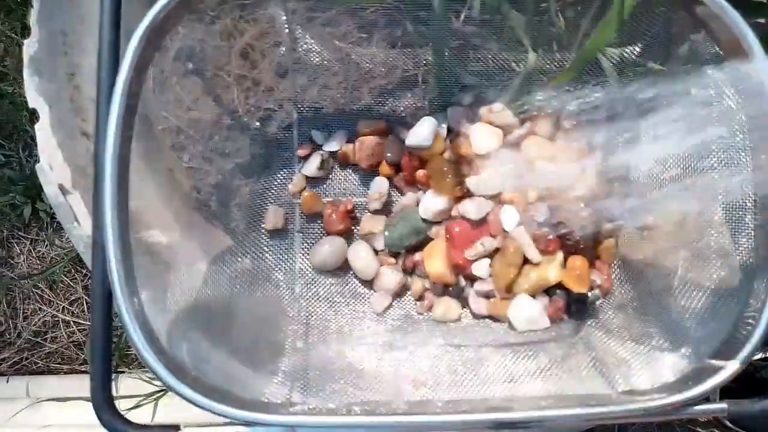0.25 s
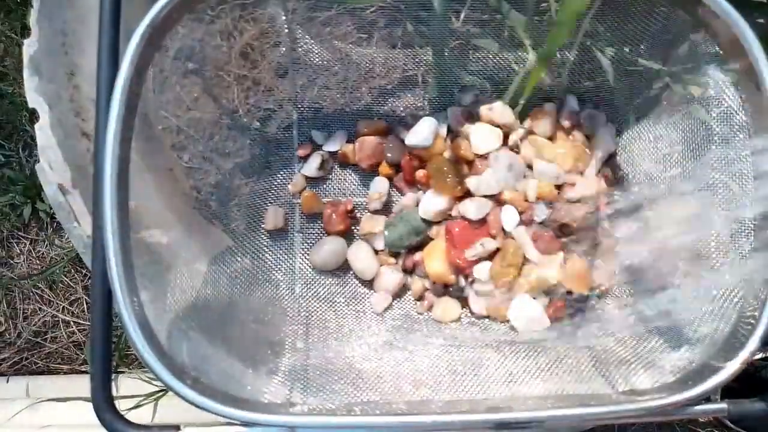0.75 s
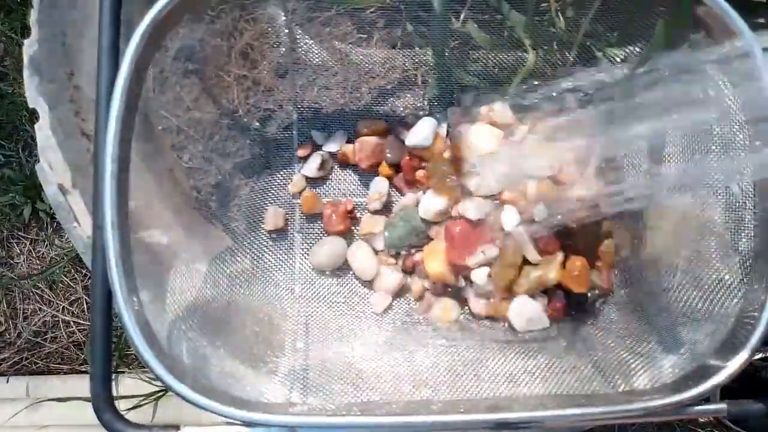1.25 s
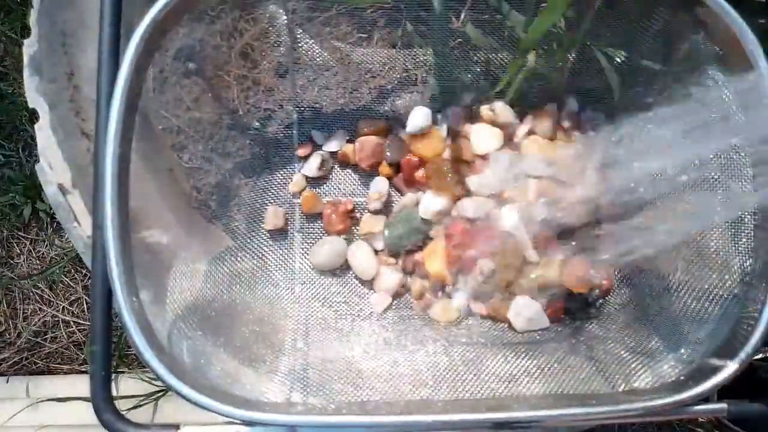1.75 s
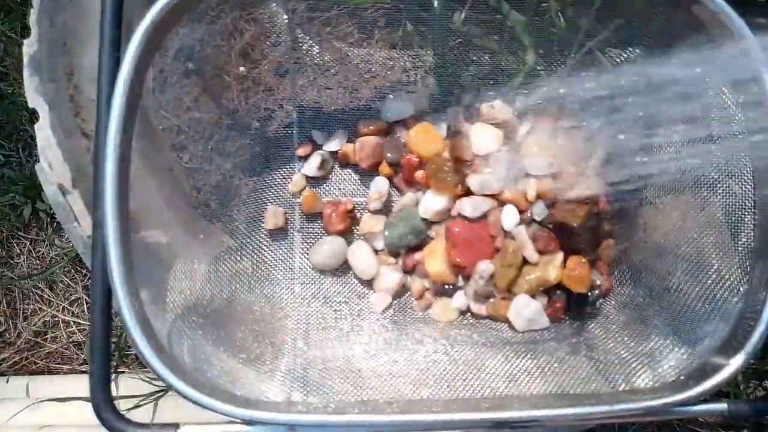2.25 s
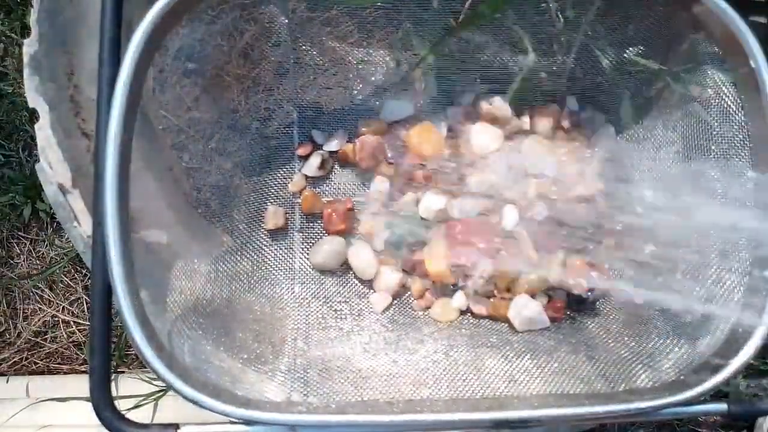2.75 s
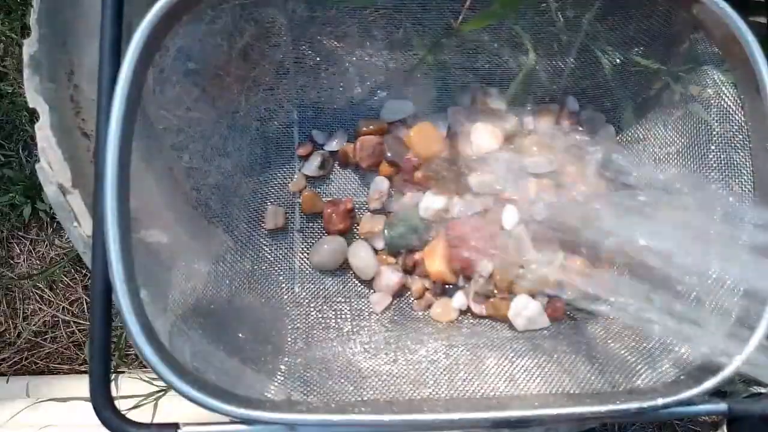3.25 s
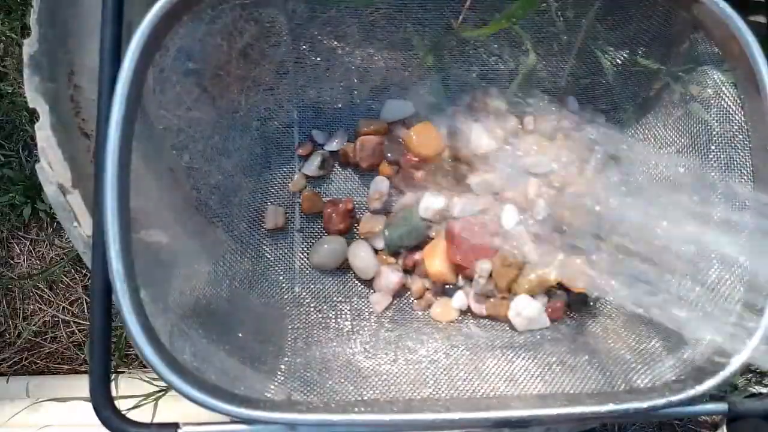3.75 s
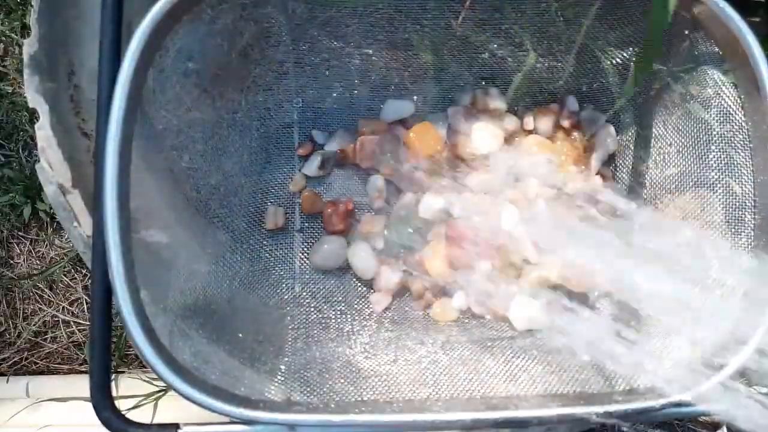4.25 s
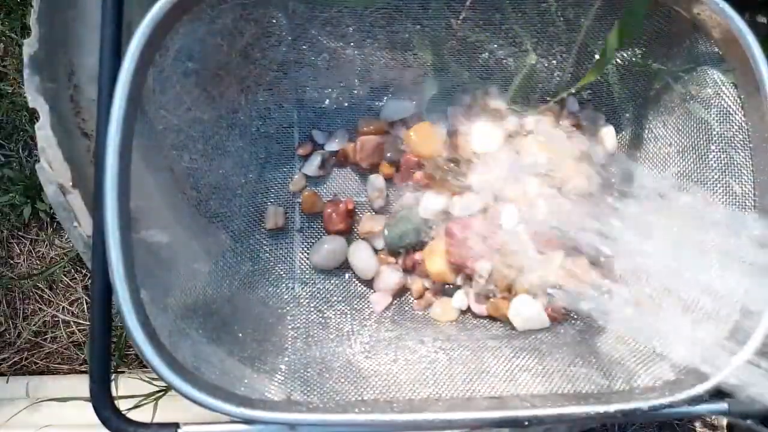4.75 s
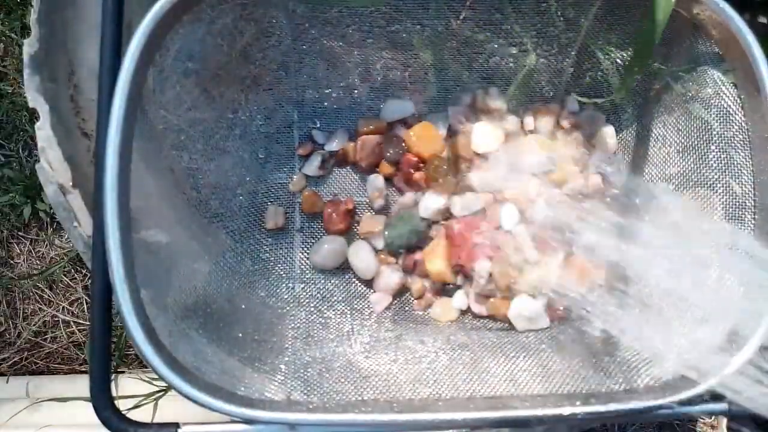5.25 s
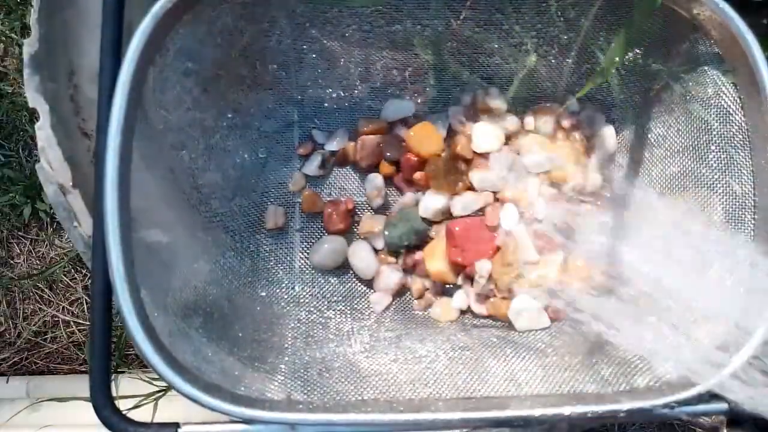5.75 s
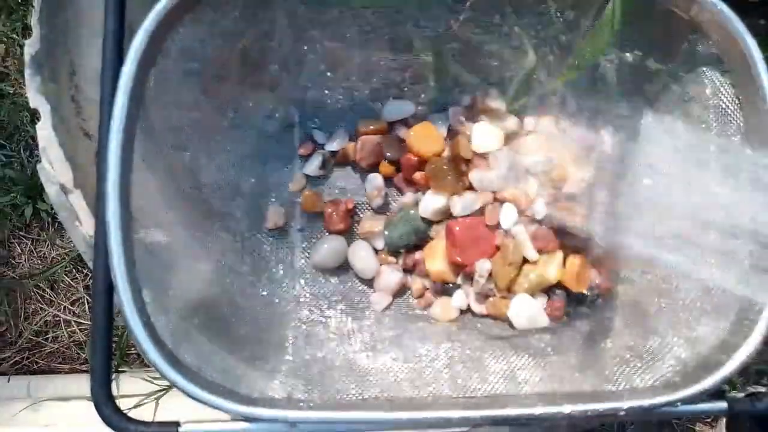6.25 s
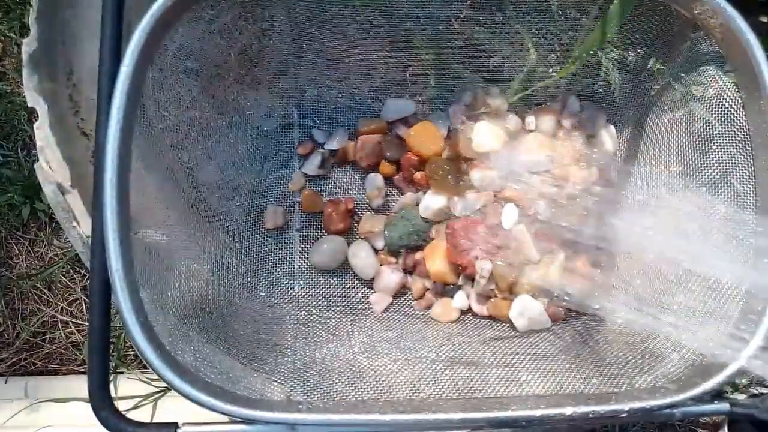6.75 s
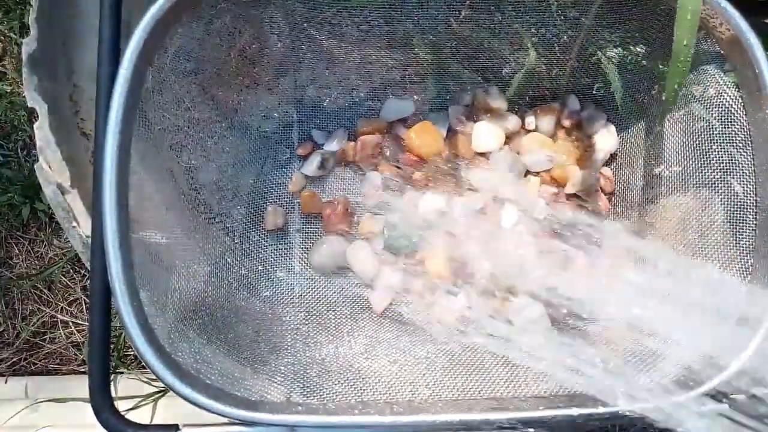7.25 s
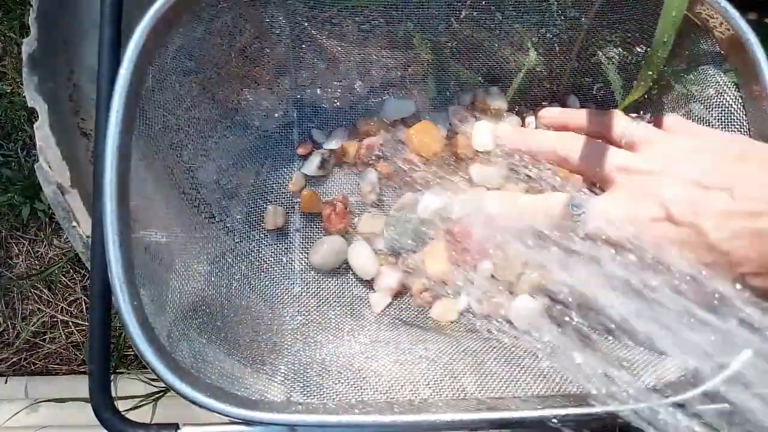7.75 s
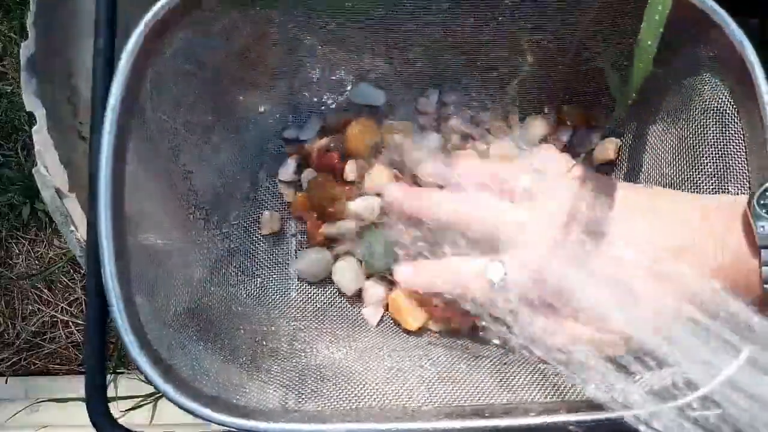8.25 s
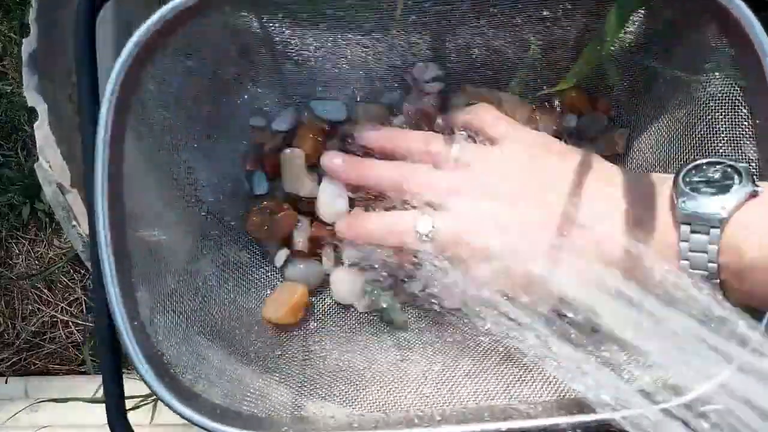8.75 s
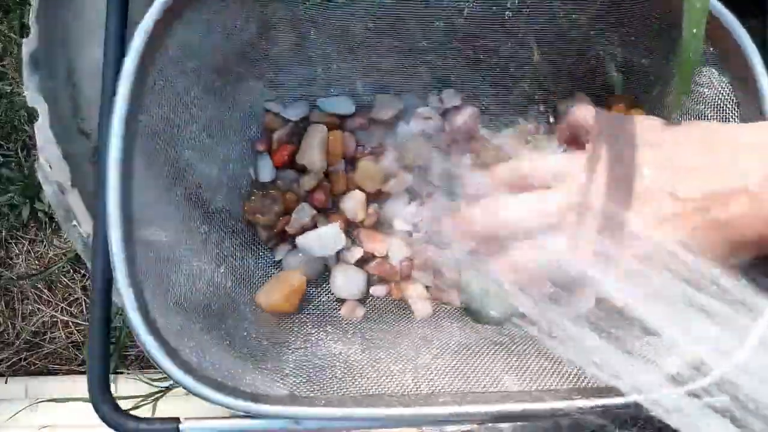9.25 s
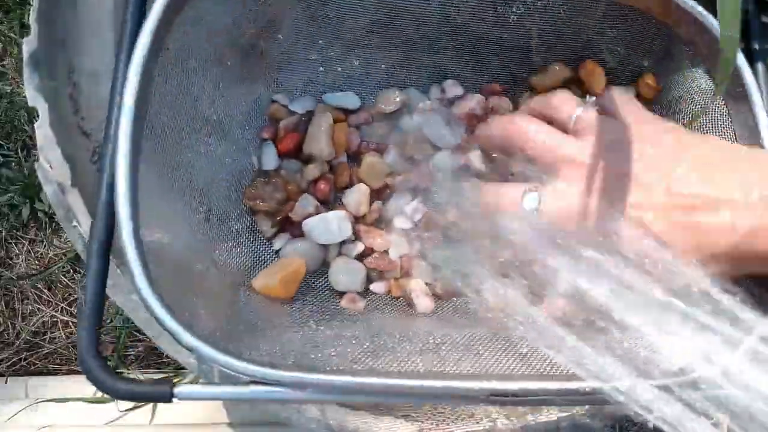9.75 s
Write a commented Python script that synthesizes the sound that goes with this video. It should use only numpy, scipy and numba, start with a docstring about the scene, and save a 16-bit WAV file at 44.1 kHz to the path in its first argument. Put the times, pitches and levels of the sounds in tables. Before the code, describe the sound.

A garden hose sprays pebbles in a wire sieve, heard close up in still outdoor air. For the first half second the sound is a thin, wet sizzle with a few sharp ticks. By about 0.8 seconds it has swelled into a bright, dense hiss of drops on the mesh and a crisp patter on the stones. It dips briefly around 1.4 seconds, then holds, wavering slightly as the jet moves. The wet sieve rings more brightly from about 2.5 seconds, and water trickles softly onto the ground underneath. At about 7.4 seconds a hand starts stirring the pebbles. The jet slaps on the hand in fuller, lower, irregular splashes, the stones clack together, with the sharpest clicks between 8 and 8.7 seconds, and water burbles faintly under the fingers. Spraying and stirring continue until the end at about 10 seconds.

```python
"""A bright, wet sizzle, thin and ticking at first, swells as a garden hose sprays pebbles in a wire sieve.
Thousands of drops a second hiss on the mesh and patter on the stones; the wet sieve rings and water
trickles off. From 7.4 s a hand stirs the pebbles: they clack, water burbles under the fingers, and the
jet slaps on the hand in fuller, lower splashes. It is all heard close up, over still garden air."""
import sys
import numpy as np
from scipy import signal
from scipy.fft import rfft, irfft
from scipy.io import wavfile
from scipy.ndimage import uniform_filter1d, minimum_filter1d
from numba import njit

SR = 44100
rng = np.random.default_rng(int(sys.argv[2]) if len(sys.argv) > 2 else 0)


def log_audio(samples):
    """Write samples as a 16-bit WAV file to the path given in sys.argv[1]."""
    # one column per channel
    frames = np.atleast_2d(samples).T
    # limit to full scale, then quantise
    limited = np.clip(frames, -1, 1)
    pcm = np.round(limited * 32767).astype(np.int16)
    wavfile.write(sys.argv[1], SR, pcm)


N = 440559
TIME_S = np.arange(N) / SR
HAND_IN_S, REACH_S, PRESS_S = 7.405, 0.023, 0.37  # the hand's cue; time to reach in and to press down


def undb(db):
    """Decibels to gain."""
    return 10 ** (np.asarray(db) / 20)


def together(a_db, b_db):
    """The level of two unrelated sounds at once."""
    return 10 * np.log10(undb(a_db) ** 2 + undb(b_db) ** 2)


def unit(x):
    """Scale to rms 1."""
    return x / np.sqrt(np.mean(x ** 2))


def curves(table):
    """The columns of a timed table as automation curves, one value a sample."""
    times, *columns = np.transpose(table)
    return [np.interp(TIME_S, times, column) for column in columns]


def hand_fade(length_s):
    """Fades from 0 to 1 at the hand's cue and stays there."""
    return np.clip((TIME_S - HAND_IN_S) / length_s, 0, 1)


def wander(per_s):
    """A random drift of rms 1 that turns per_s times a second."""
    return unit(np.interp(TIME_S * per_s, np.arange(N // 4), rng.standard_normal(N // 4)))


def colour(x, tone, size=2048):
    """Minimum-phase EQ through the points of a tone table; the result has rms 1."""
    hz, db = np.transpose(tone)
    grid_hz = np.maximum(np.arange(size // 2 + 1) * SR / size, 1)
    gains = undb(np.interp(np.log(grid_hz), np.log(hz), db))
    cepstrum = irfft(np.log(gains))
    cepstrum[1:size // 2] *= 2
    cepstrum[size // 2 + 1:] = 0
    impulse = irfft(np.exp(rfft(cepstrum)))
    return unit(signal.fftconvolve(x, impulse)[:N])


@njit
def bandpass(x, hz, width_hz):
    """State-variable band-pass whose centre may move."""
    out, band, low = np.empty(len(x)), 0., 0.
    for i in range(len(x)):
        tuning, damping = np.tan(np.pi * hz[i] / SR), width_hz / hz[i]
        swing = (band + tuning * (x[i] - low)) / (1 + tuning * (tuning + damping))
        band, low = 2 * swing - band, low + 2 * tuning * swing
        out[i] = damping * swing
    return out


def ring(x, hz, width_hz):
    """A steep-sided resonance; the result has rms 1."""
    centre_hz = hz * np.ones(N)
    once = bandpass(x, centre_hz, float(width_hz))
    return unit(bandpass(once, centre_hz, float(width_hz)))


def drops(per_s, scatter_db):
    """Random impacts of unequal size; the power stays even however many fall."""
    chance = 1 - np.exp(-per_s / SR)
    hits = rng.random(N) < chance
    sizes = undb(scatter_db * rng.standard_normal(N)) * rng.standard_normal(N)
    return unit(hits * sizes / np.sqrt(chance))


# The dull bed of the quiet garden: frequency_hz, level_db
AIR_TONE = [(20, 10), (45, -3), (75, 0), (125, 3.5), (200, -7.5), (500, 7), (4000, -28)]


def garden_air():
    """Still air lays a faint, dark noise under everything."""
    return undb(-77.5) * colour(rng.standard_normal(N), AIR_TONE)


# Cues for the soft low bumps: centre_s, level_db
BUMP_CUES = [(0.819, -65), (1.108, -67), (1.307, -61), (2.225, -59), (2.727, -68), (2.868, -64.5),
             (3.906, -64), (4.028, -61), (4.481, -62), (6.619, -60.5), (6.717, -64), (6.841, -64),
             (7.226, -58.5), (7.407, -62), (8.073, -46.5), (8.293, -55), (8.486, -62), (8.771, -59),
             (9.243, -63), (9.467, -54)]


def bumps(width_s, gain_db):
    """Single soft pressure pulses, a few milliseconds long."""
    out, count = np.zeros(N), 800
    pulse = np.exp(-((np.arange(count) - count // 2) / SR / width_s) ** 2)
    for centre_s, level_db in BUMP_CUES:
        start = int(centre_s * SR) - count // 2
        out[start:start + count] += undb(level_db + gain_db) * pulse
    return out


# The round, low-mid tone of water landing on the ground: frequency_hz, level_db
RUNOFF_TONE = [(100, -25), (175, -17), (230, -9), (310, -2.5), (450, -2.5), (580, 1.5), (780, 3), (1000, 0),
               (1600, -8.5)]


def runoff(jet_db):
    """Bigger drops fall through the mesh and trickle on the ground, following a third of the jet's swing."""
    level_db = -51.05 + 0.33 * (jet_db - np.median(jet_db)) + 1.8 * wander(14)
    return undb(level_db) * colour(drops(6000, scatter_db=1.0), RUNOFF_TONE)


def pebble_clacks(splash_db, low_hz, high_hz, decay_s, gain_db, scatter_db, count):
    """Stirred pebbles knock together, each at its own pitch, hardest within a splash."""
    t, out = np.arange(SR // 40) / SR, np.zeros(N + SR)
    for when, pitch, softness in rng.random((count, 3)):
        start = int(HAND_IN_S * SR + when * (N - 1 - HAND_IN_S * SR))
        pitch_hz = low_hz * (high_hz / low_hz) ** pitch
        knock = np.sin(2 * np.pi * pitch_hz * t) * np.exp(-t / decay_s)
        out[start:start + len(t)] += undb(splash_db[start] + gain_db - scatter_db * softness) * knock
    return out[:N]


# Sharp accents from heavy drops and knocked pebbles: start_s, level_db
TICK_CUES = [(0.2668, -14), (0.307, -23), (0.3586, -14), (0.4015, -13), (0.4817, -12), (1.0714, -9),
             (2.0597, -18), (3.052, -10), (3.1562, -16), (7.3914, -17), (7.5836, -9), (7.8022, -7),
             (8.074, -6), (8.184, -1), (8.3864, 2), (8.486, -8.5), (8.5254, -7), (8.6213, -10), (8.676, 1),
             (8.7715, -17), (9.1324, -10), (9.2988, -7), (9.839, -10)]


def ticks(decay_s, gain_db):
    """A heavy drop or a knocked pebble gives a bright crack, too brief to carry bass."""
    out, count = np.zeros(N), 256
    fade = np.exp(-np.arange(count) / SR / decay_s)
    bursts = fade * rng.standard_normal((len(TICK_CUES), count))
    cracks = signal.sosfilt(signal.butter(2, [10200, 14800], "bandpass", fs=SR, output="sos"), bursts)
    for (start_s, level_db), crack in zip(TICK_CUES, cracks):
        start = int(start_s * SR)
        out[start:start + count] += undb(level_db + gain_db) * crack / np.max(np.abs(crack))
    return out


# Slugs of water hitting stones and hand, with a send to each layer they excite:
# start_s, length_s, slap_db, mesh_db, hollow_ring_db, cupped_ring_db
SPLASH_CUES = [(0.283, 0.019, -46.5, -45, -66, -58), (7.417, 0.099, -35, -22, -57, -39),
               (7.655, 0.1, -36, -22, -38.5, -31), (7.801, .15, -38, -21.5, -42, -35),
               (8.077, 0.097, -36.5, -22, -36, -44), (8.214, 0.11, -36, -21, -39, -52),
               (8.372, 0.017, -42, -19, -33.5, -46), (8.533, 0.034, -47, -32, -42, -41),
               (8.611, 0.018, -43, -17.5, -54, -52), (8.663, 0.051, -38, -24, -42, -41),
               (8.8, 0.052, -34.5, -24.5, -44, -35), (8.931, .08, -34, -21, -43, -30.5),
               (9.015, 0.076, -38.5, -21.5, -59, -40), (9.107, 0.098, -39.5, -21.5, -47, -30),
               (9.242, 0.14, -43.5, -23.5, -52.5, -39), (9.406, 0.083, -37.5, -23, -40, -31),
               (9.579, 0.094, -36, -24.5, -40.5, -38), (9.815, .1, -41, -21, -47, -54.5)]


def splash_envelopes(attack_s, release_s):
    """Each splash swells, holds and dies away; one envelope in dB for each layer it excites."""
    t, gains = np.arange(SR // 2) / SR, np.zeros((4, N + SR))
    for start_s, length_s, *sends_db in SPLASH_CUES:
        shape = np.minimum(t / attack_s, 1) * np.exp(-np.maximum(t - length_s, 0) / release_s)
        start = int(start_s * SR)
        gains[:, start:start + len(t)] += np.outer(undb(sends_db), shape)
    return 20 * np.log10(gains[:, :N] + 1e-9)


# The full midrange of a slap of water: frequency_hz, level_db
SPLASH_TONE = [(150, -68), (350, -16.5), (520, -28.5), (750, -7), (1050, -5.5), (1500, -3), (1830, -2),
               (2100, -1.5), (2400, 0), (3200, 3.5), (4600, 0), (6000, 1), (9000, -23), (14000, -22)]


def splashes(splash_db, cupped_db):
    """Water slaps on stones and skin; it rings under the fingers and burbles louder as it gathers."""
    burble_db = -70.5 + 4 * (TIME_S - HAND_IN_S) + 2.2 * wander(30)
    slap = undb(splash_db + 3.5) * colour(drops(11000, scatter_db=0.8), SPLASH_TONE)
    burble = ring(drops(900, scatter_db=2.0), hz=360 * (1 + 0.041 * wander(15)), width_hz=150)
    cupped = undb(cupped_db - 5.0) * ring(drops(4400, scatter_db=9.0), hz=2170, width_hz=590)
    return slap + cupped + hand_fade(REACH_S) * undb(burble_db) * burble


# Notches either side of the sieve's bright ring, depths from 0 to 1:
# time_s, lower_depth, upper_depth, upper_hz
NOTCH_MOVES = [(0.0, 0.1, 0.6, 4230), (0.4, .02, 0.6, 4250), (0.6, 0.4, 0.7, 4360), (1.9, 0, 0.44, 4160),
               (2.5, 0.1, 0, 4750), (3.3, 0.1, 0.26, 4600), (5.3, 0.24, 0.24, 4900), (7.3, 0.5, 0.14, 5000),
               (7.5, .05, 0.3, 4850)]


def sieve_notches(x, lower_hz, width_hz):
    """Beside a resonance the sieve moves against the direct sound and partly cancels it."""
    lower_depth, upper_depth, upper_hz = curves(NOTCH_MOVES)
    x = x - lower_depth * bandpass(x, lower_hz * np.ones(N), float(width_hz))
    return x - upper_depth * bandpass(x, upper_hz, float(width_hz))


def sieve_rings(mesh_db, knock_db, bright_db, middle_db, thin_db, hollow_db):
    """Drops keep four damped resonances ringing, each as strong as the landing spot allows."""
    drum_db = together(mesh_db + hollow_db + 1.3 * wander(16), knock_db)
    # the hollow ring sinks under a square hit and rises, unsteady, under the pressing hand
    free_hz = 1202 - 3.9 * (bright_db - np.median(bright_db))
    pressed_hz = 1471 * (1 + 0.058 * wander(45))
    drum_hz = free_hz + hand_fade(PRESS_S) * (pressed_hz - free_hz)
    splutter_db, drift = 0.97 * wander(24), 0.011
    bright_hz = 3577 * (1 + drift * wander(9))
    # level_db, pitch_hz, width_hz
    modes = [(drum_db + 0.5, drum_hz * (1 + drift * wander(4.2)), 260),
             (mesh_db + bright_db + splutter_db - 0.7, bright_hz, 500),
             (mesh_db + middle_db - 2.0, 5500, 850),
             (mesh_db + thin_db - 1.5, 6680, 750)]
    rings = sum(undb(db) * ring(drops(12000, scatter_db=0.6), hz, width) for db, hz, width in modes)
    return sieve_notches(rings, lower_hz=3070, width_hz=300)


# The broad, crisp patter of drops on stone: frequency_hz, level_db
PATTER_TONE = [(150, -50), (500, -28), (1000, -22), (1600, -16.5), (2300, -13.5), (2950, -10), (3900, -4),
               (4400, -3.5), (4950, -4.5), (5450, -8), (6100, -3), (7500, -2.5), (8200, -0.5), (10000, 0.5),
               (12500, -10)]
# The airy top end of fine drops on wire: frequency_hz, level_db
SIZZLE_TONE = [(5000, -47.5), (9000, -18.5), (10800, -5), (11900, 2), (12800, 7), (13700, 1), (14600, 2.5),
               (15700, -5)]


def spray(sizzle_db, patter_db, peak_hz):
    """Fine drops sizzle on the wires and patter on stone; a weaker jet gives fewer, grainier hits."""
    flow = undb(sizzle_db - np.max(sizzle_db))
    mist = colour(drops(36000 * flow, scatter_db=-1.3), SIZZLE_TONE)
    wires = ring(drops(24000 * flow, scatter_db=3.5), peak_hz, width_hz=6100)
    sizzle = unit(mist + undb(-6.0) * wires) * undb(sizzle_db + 0.5 * wander(40))
    patter = colour(drops(36000 * flow, scatter_db=0.4), PATTER_TONE)
    return sizzle + undb(patter_db) * sieve_notches(patter, lower_hz=3020, width_hz=940)


# The main fader: how hard the wandering jet strikes, held once the hand is in: time_s, level_db
JET_FORCE = [(0.0, -24.5), (0.2, -27), (0.33, -30), (0.44, -29), (0.5, -26.5), (0.55, -21), (0.66, -20.5),
             (0.76, -17.5), (1.24, -19), (1.31, -21.5), (1.4, -24), (1.55, -17.5), (1.62, -23.5),
             (1.75, -18.5), (1.97, -19), (2.07, -20.5), (2.16, -16), (2.62, -17), (3.0, -18.5),
             (3.03, -20.5), (3.16, -22.5), (3.27, -18), (3.75, -17), (3.94, -20), (4.09, -16),
             (4.19, -21.5), (4.4, -16.5), (4.65, -18.5), (5.55, -17.5), (6.0, -19.5), (6.28, -17),
             (6.85, -17), (7.2, -20.5), (7.4, -18.5)]
# The landing spot favours one resonance or another; levels ride on the jet's:
# time_s, bright_ring_db, middle_ring_db, thin_ring_db, hollow_ring_db, stones_db, sizzle_peak_hz
JET_AIM = [(0.0, -40, -33, -25, -35.5, -10, 13700), (0.75, -25.5, -20, -25, -35, -9.5, 12700),
           (1.6, -27, -23, -17.5, -31.5, -8, 12900), (2.45, -18.5, -16.5, -14.5, -35.5, -11.5, 12100),
           (2.95, -12, -23, -18, -32.5, -10.5, 13100), (3.12, -13.5, -19, -17.5, -29, -10.5, 12900),
           (3.3, -13, -20, -19, -31.5, -10.5, 13100), (3.75, -13, -17.5, -17.5, -32.5, -10.5, 13000),
           (4.4, -13, -16.5, -20.5, -32, -10, 12930), (5.2, -15.5, -15.5, -20, -31, -10, 13300),
           (6.1, -14, -23, -19.5, -31.5, -10, 13000), (6.6, -16, -20, -19.5, -35, -13.5, 13100),
           (7.05, -9, -17.5, -17, -28.5, -10, 12600), (7.5, -17, -15, -16.5, -32, -7, 13100),
           (9.3, -22.5, -19, -22.5, -24, -10.5, 12500), (9.9, -13, -17, -15, -33, -9.5, 12400)]


def hose_on_pebbles():
    """One jet and its splashes drive the mesh, the stones and the run-off."""
    jet_db, = curves(JET_FORCE)
    *ring_dbs, stones_db, peak_hz = curves(JET_AIM)
    slap_db, spurt_db, knock_db, cupped_db = splash_envelopes(attack_s=0.013, release_s=0.011)
    # the hand shields the mesh, breaks up the jet and takes a steady spray on the skin
    hand_in = hand_fade(REACH_S)
    shield_db = hand_in * (-2.5 + 1.2 * wander(49))
    skin_db = -40 + 20 * np.log10(hand_in + 1e-9)
    mesh_db = together(jet_db + shield_db, spurt_db)
    splash_db = together(slap_db, skin_db)
    patter_db = together(mesh_db + stones_db + 0.5, splash_db + 8.0) + 0.66 * wander(50)
    rings = sieve_rings(mesh_db, knock_db, *ring_dbs)
    impacts = rings + spray(mesh_db + 1.37, patter_db, peak_hz) + splashes(splash_db, cupped_db)
    clacks = pebble_clacks(splash_db, low_hz=1300, high_hz=5230, decay_s=0.003,
                           gain_db=10, scatter_db=18.5, count=170)
    trickle = runoff(jet_db)
    # the jet breaks into slugs of water: a slow sway and quick clumps
    surge = unit(undb(0.51 * wander(28) + 0.5 * wander(240)))
    water = impacts * surge + trickle + clacks + ticks(decay_s=0.0014, gain_db=1)
    # the bass is cut from the water sound below about 190 Hz
    return signal.sosfilt(signal.butter(4, 190, "highpass", fs=SR, output="sos"), water)


def scene():
    """The hose up front, soft bumps and garden air behind; both channels are alike."""
    mix = hose_on_pebbles() + bumps(width_s=0.00085, gain_db=7.0) + garden_air()
    return np.tile(mix, (2, 1))


def record(dry):
    """A quick limiter holds down the very sharpest drops, and the top is cut."""
    ceiling, top_hz = 0.68, 15720
    gain = np.minimum(1, ceiling / (np.abs(dry) + 1e-9))
    gain = uniform_filter1d(minimum_filter1d(gain, size=65), size=65)
    return signal.sosfilt(signal.ellip(14, 0.1, 85, top_hz, fs=SR, output="sos"), dry * gain)


dry = scene()
out = record(dry)
log_audio(out)
```